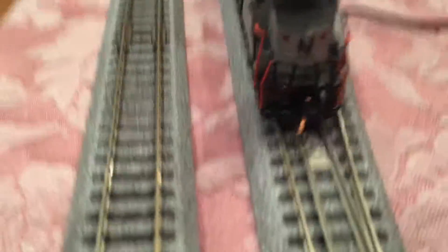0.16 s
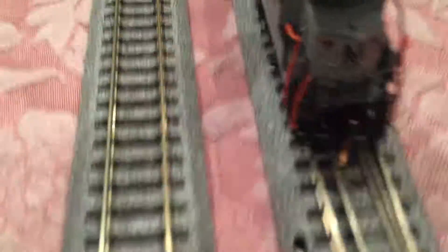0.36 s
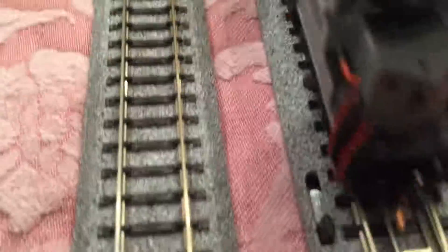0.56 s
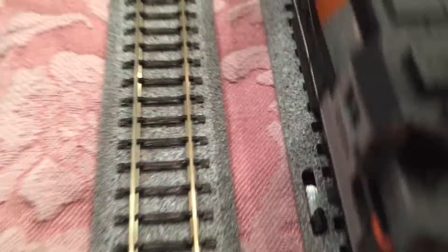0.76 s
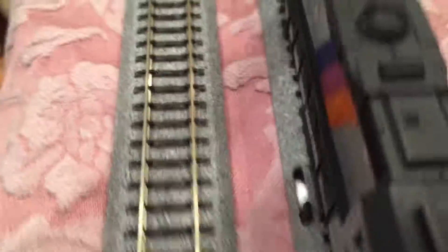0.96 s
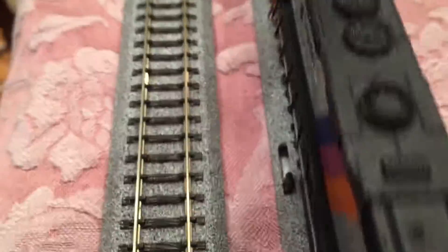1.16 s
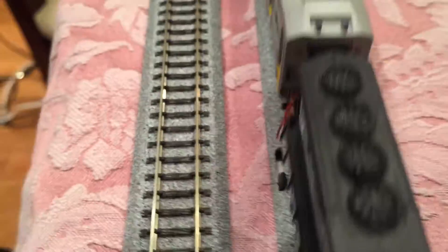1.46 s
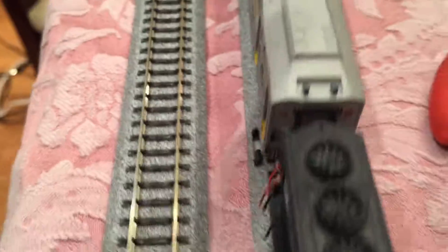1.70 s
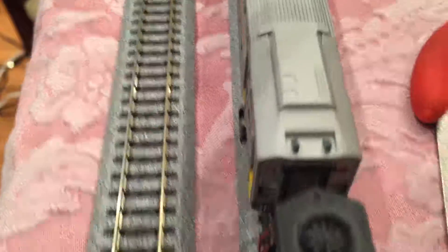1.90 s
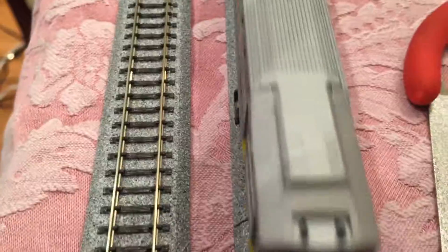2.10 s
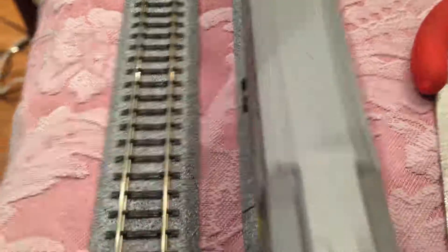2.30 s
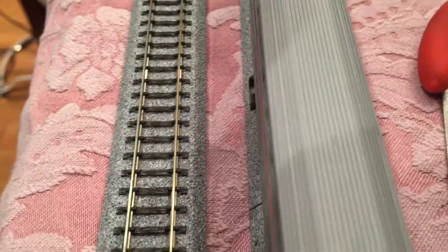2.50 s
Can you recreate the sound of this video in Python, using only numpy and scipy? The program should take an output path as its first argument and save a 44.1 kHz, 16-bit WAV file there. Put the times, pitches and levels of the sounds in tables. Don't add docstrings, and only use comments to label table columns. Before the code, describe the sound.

A small electric model train passes close to the microphone, its motor singing a thin steady high whine over a plastic hum and gritty gear hiss, wheels ticking irregularly over rail joints in a quiet room.

```python
import sys
import numpy as np
from scipy import signal
from scipy.fft import rfft, irfft, next_fast_len
from scipy.io import wavfile
from scipy.ndimage import map_coordinates

SR = 44100
rng = np.random.default_rng(int(sys.argv[2]) if len(sys.argv) > 2 else 0)


def convert_level_to_amplitude(level_db):
    exponent = np.asarray(level_db, float) / 20
    return 10 ** exponent


def transcribe(signal):
    frames = np.atleast_2d(signal).T
    limited = np.clip(frames, -1, 1)
    pcm = np.round(limited * 32767).astype(np.int16)
    wavfile.write(sys.argv[1], SR, pcm)


N = 116865
TIME = np.arange(N) / SR


def unit(x):
    return x / np.sqrt(np.mean(x ** 2) + 1e-20)


def noise():
    return rng.standard_normal(N)


def curves(rows):
    seconds, *columns = np.transpose(rows)
    return [np.interp(TIME, seconds, column) for column in columns]


def wobble(rate):
    knots = rng.standard_normal(int(N * rate / SR) + 4)
    return map_coordinates(knots, [TIME * rate])


def filtered(x, response):
    size = next_fast_len(N + 8192)
    hz = np.fft.rfftfreq(size, 1 / SR)
    return irfft(rfft(x, size) * response(hz), size)[:N]


def band(hz, width_hz):
    def response(f):
        once = 1j * f * width_hz / (hz * hz - f * f + 1j * f * width_hz)
        return once ** 2
    return response


def facing(levels_db, drift_db):
    facing_s = [
        .55,
        1.14,
        1.75,
        2.5,
    ]
    return convert_level_to_amplitude(np.interp(TIME, facing_s, levels_db) + drift_db * wobble(5.15))


def body(push, modes, widths_hz, drift_db, own_db):
    total = np.zeros(N)
    sign = 1
    for (hz, *levels_db), width_hz in zip(modes, widths_hz):
        shaken = push * convert_level_to_amplitude(own_db * wobble(90))
        ring = unit(filtered(shaken, band(hz, width_hz)))
        total += sign * facing(levels_db, drift_db) * ring
        sign = -sign
    return total


def tone(hz, fuzz, flutter_db):
    phase = 2 * np.pi * hz * TIME + fuzz * wobble(29.47)
    return np.sqrt(2) * convert_level_to_amplitude(flutter_db * wobble(25.2)) * np.sin(phase)


def motor(knocks):
    # frequency in Hz, phase wander in radians.
    tones = [(1073, .2), (1536, .4), (1683, .6), (1982, 1.1), (2147, .5), (3992, 1.2), (4584, .6),
             (5908, .5), (6054, .6), (6517, .4), (6751, 1), (15208, .4)]
    # level in dB at nose, flank, rear, coach.
    tone_db = [(-58, -57, -58.5, -57.5), (-64, -59.5, -57, -57.5), (-55.5, -53, -54.5, -51.5),
               (-68, -71, -71, -53.5), (-51, -49.5, -52, -79), (-70, -56, -51, -57),
               (-59, -51.5, -57.5, -52.5), (-54, -64, -60.5, -67), (-60, -67, -74, -73),
               (-53, -62, -59, -63.5), (-60, -71, -70, -83), (-64, -63, -58, -63)]
    # frequency in Hz,
    # level in dB at nose, flank, rear, coach.
    shell = [(586, -73.5, -66.5, -68, -69), (831.2, -66, -62.5, -61, -62), (1192, -60, -54.5, -57.5, -55.5),
             (1610, -51.5, -52, -54.5, -50.5), (1988, -52, -46, -46, -47.5), (2455, -48.5, -49, -57.5, -60),
             (3350, -50.5, -47, -50.5, -45), (3800, -53, -55, -54, -51.5), (4430, -52, -44.5, -54, -49)]
    shell_width_hz = [59, 34.8, 540, 378, 383, 540, 650, 556, 627]
    lines = np.zeros(N)
    for (hz, fuzz), levels_db in zip(tones, tone_db):
        note = tone(hz, fuzz, flutter_db=2.38 * fuzz)
        lines += facing(levels_db, drift_db=2.0 * fuzz) * note
    push = noise() + 1.68 * knocks
    hum = body(push, shell, shell_width_hz, drift_db=0.03, own_db=1.0)
    return lines + filtered(hum, lambda f: 1 / np.sqrt(1 + (f / 4630) ** 60))


def whine():
    # time in seconds, level in dB, partner's level over the note in dB.
    whine_levels = [(0, -47, -17), (.26, -44, -9), (.45, -43.5, -5), (.6, -43.5, -13), (.76, -44.5, -4),
                    (.91, -52, -6), (1.1, -52.5, -3), (1.3, -62, 4), (1.6, -51.5, -1), (1.9, -44, -7),
                    (2.1, -41.5, -15), (2.3, -41, -4), (2.48, -43, -4), (2.65, -52, -11)]
    level_db, partner_db = curves(whine_levels)
    note = tone(3005.3, fuzz=.18, flutter_db=.6)
    partner = convert_level_to_amplitude(partner_db + 1.5 * wobble(6)) * tone(3075, fuzz=.45, flutter_db=1.8)
    skirt = convert_level_to_amplitude(-3) * unit(filtered(noise(), band(3035, width_hz=370)))
    return convert_level_to_amplitude(level_db) * (note + partner + skirt)


def gears(once, twice, knocks):
    # time in seconds, level in dB.
    gear_load = [(0, -0.5), (.1, -1.5), (.2, -1), (.6, 0.5), (.9, -1), (1.2, 0), (1.35, -3), (1.45, 0),
                 (1.95, 0.5), (2.1, 0), (2.3, 1.5), (2.45, -1), (2.65, -5)]
    # frequency in Hz, level in dB at nose, flank, rear, coach.
    trucks = [(4040, -80, -51.5, -46.5, -49.5), (5235, -54.5, -57, -59.5, -63),
              (5940, -51.5, -55.5, -54.5, -54.5), (6440, -51.5, -57.5, -52, -55),
              (7026, -54.5, -51.5, -52, -57.5), (7960, -56, -56.5, -60.5, -55),
              (8750, -56.5, -54.5, -53, -52), (9530, -54, -56, -56, -50.5), (11100, -60, -50.5, -60, -57),
              (12300, -59, -53.5, -54.5, -56.5), (13460, -56.5, -49.5, -60, -52),
              (14100, -58, -55, -58, -55), (15100, -59, -56, -61, -52), (15800, -59, -62, -61, -56)]
    truck_width_hz = [403, 804, 625, 580, 540, 805, 540, 1140, 1100, 1300, 1000, 1300, 1110, 1100]
    shaft_hz = 111.5 * (1 + 0.0087 * wobble(4.1))
    turn = 2 * np.pi * np.cumsum(shaft_hz) / SR
    pulse = np.exp(0.7 * (once * np.cos(turn) + twice * np.cos(2 * turn + 1)))
    grit = convert_level_to_amplitude(0.6 * wobble(400) + 0.77 * wobble(70) + 0.41 * wobble(15))
    push = pulse * grit * (noise() + 2.6 * knocks)
    load_db, = curves(gear_load)
    return convert_level_to_amplitude(load_db) * body(push, trucks, truck_width_hz, drift_db=0.85, own_db=1.0)


def chatter():
    knocks_per_s, spread_db = 180, 12.5
    happens = rng.random(N) < knocks_per_s / SR
    return -happens.astype(float) * convert_level_to_amplitude(rng.uniform(0, spread_db, N))


def blows(rows, trim_db, crack, t60):
    out = np.zeros(N + SR)
    t = np.arange(1000) / SR
    shape = convert_level_to_amplitude(-60 * t / t60) * (1 - np.exp(-t / 0.00065))
    for start_s, peak_db, hz in rows:
        ring = np.sin(2 * np.pi * hz * t)
        bright_noise = np.diff(rng.standard_normal(len(t) + 1))
        snap = crack * convert_level_to_amplitude(-60 * t / .008) * bright_noise
        start = round(start_s * SR)
        out[start:start + len(t)] += convert_level_to_amplitude(peak_db + trim_db) * shape * (ring + snap)
    return out[:N]


def wheels():
    # start in seconds, peak in dB, ring frequency in Hz.
    joints = [(0.0922, -13, 5600), (0.1244, -16.5, 5500), (0.5196, -13, 6600), (0.5944, -36, 6520),
              (0.634, -13, 6460), (0.6724, -26, 6640), (0.8378, -14.5, 5900), (1.0177, -13, 7040),
              (1.0944, -27, 6960), (1.123, -21, 11200), (1.204, -16, 13200), (1.2206, -17, 7100),
              (1.2494, -38, 13000), (1.3035, -18, 6950), (1.414, -20, 8590), (1.4835, -28, 6760),
              (1.546, -18, 8750), (1.6641, -23, 6300), (1.8622, -18, 6100), (1.9794, -22, 6270),
              (2.0494, -38, 6740), (2.2194, -20, 8400), (2.3354, -25, 8940), (2.5174, -30, 13200)]
    # start in seconds, peak in dB, ring frequency in Hz.
    dull_knocks = [
        (.838, -22, 2930),
        (1.123, -28, 3420),
        (1.168, -26, 3800),
        (1.25, -23, 3600),
        (1.423, -23, 3900),
        (1.595, -31, 4100),
        (2.385, -19.5, 3100),
    ]
    ticks = blows(joints, trim_db=-8.5, crack=0.96, t60=0.0066)
    return ticks + blows(dull_knocks, trim_db=2.5, crack=.1, t60=0.0074)


def room():
    # frequency in Hz, level in dB per Hz.
    rumble_colour = [(25, -44), (62, -2.5), (80, -16.5), (117, 1), (160, -7.5), (300, -17.5), (560, -26.5),
                     (900, -21)]
    colour_hz, colour_db = np.transpose(rumble_colour)

    def colour(hz):
        return convert_level_to_amplitude(np.interp(np.log(hz + 1), np.log(colour_hz), colour_db)) * (hz < 1300)

    rumble = convert_level_to_amplitude(-51) * unit(filtered(noise(), colour))
    hiss = convert_level_to_amplitude(-62) * np.diff(rng.standard_normal(N + 1))
    return rumble + hiss


def scene():
    # time in seconds, nearness in dB,
    # gear pulsing once a turn (0 to 1), gear pulsing twice a turn (0 to 1).
    passing = [(0, -2.5, 0, .1), (.3, -2, 0.2, 0.1), (.7, 0, 0.5, 0), (1, -0.5, 0.04, .3),
               (1.25, -0.5, 0.4, 0.62), (1.4, 0.5, 0.47, 0), (1.7, 1, 0.5, 0.17), (2, 0.5, 0.54, 0),
               (2.25, 0.5, 0.03, 0.45), (2.5, 0.5, .2, .4), (2.65, 0.5, 0, 0)]
    near_db, once, twice = curves(passing)
    knocks = chatter()
    train = convert_level_to_amplitude(near_db) * motor(knocks) + whine() + gears(once, twice, knocks)
    return (train + wheels() + room())[None]


def band_limit(x):
    return signal.sosfilt(signal.butter(12, 16670, fs=SR, output="sos"), x)


def record(dry):
    mix = filtered(dry[0], lambda f: f < 15745)[None]
    return band_limit(mix)


dry = scene()
out = record(dry)
transcribe(out)
```